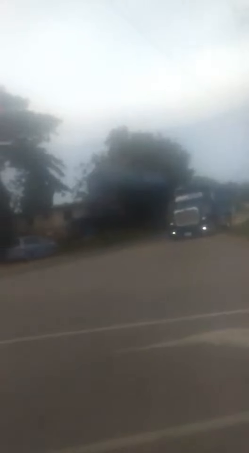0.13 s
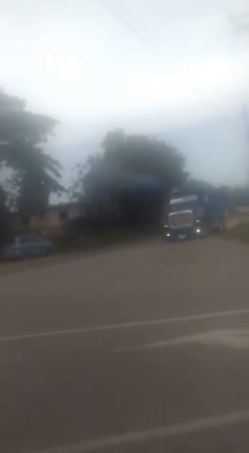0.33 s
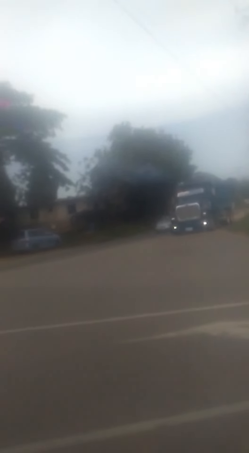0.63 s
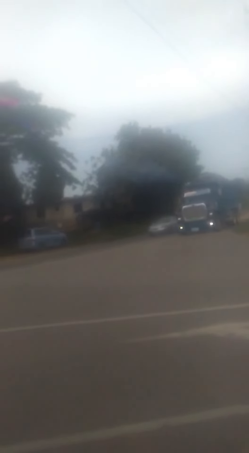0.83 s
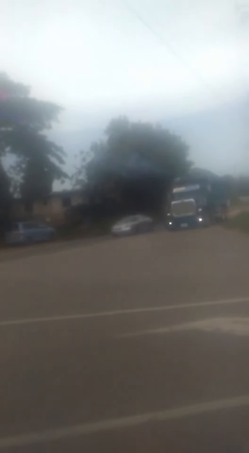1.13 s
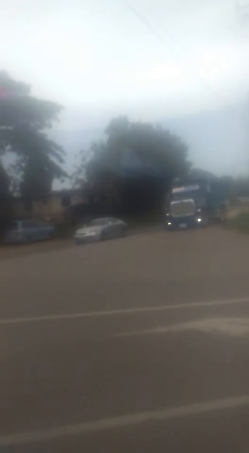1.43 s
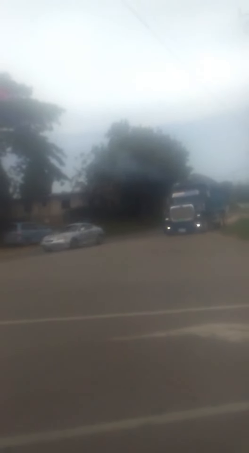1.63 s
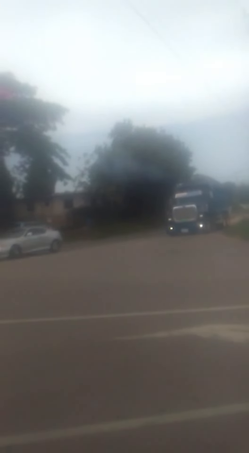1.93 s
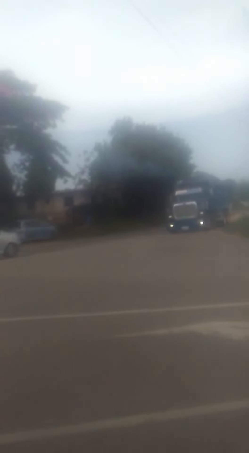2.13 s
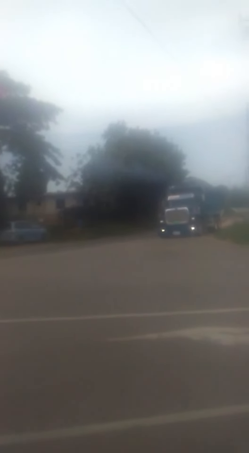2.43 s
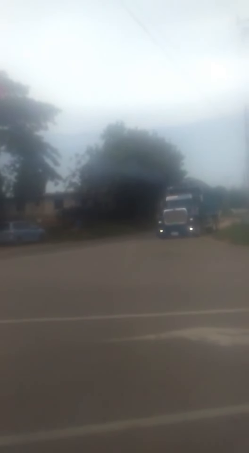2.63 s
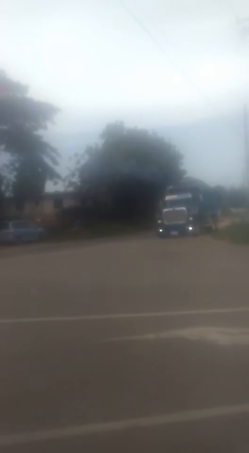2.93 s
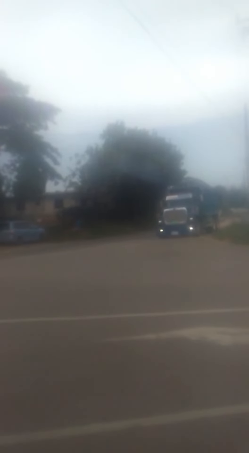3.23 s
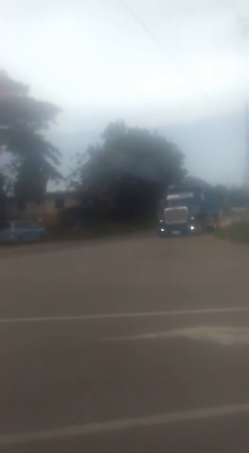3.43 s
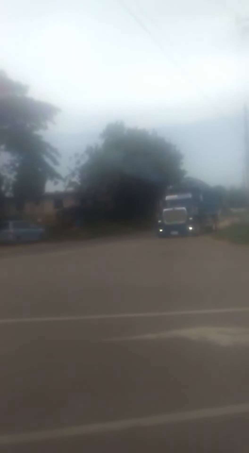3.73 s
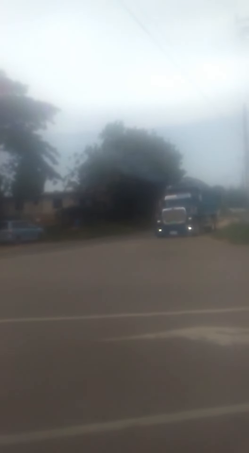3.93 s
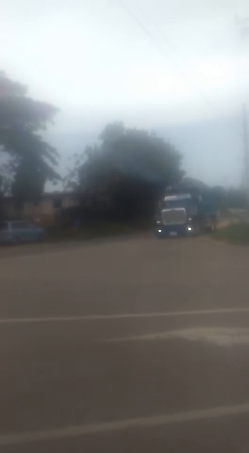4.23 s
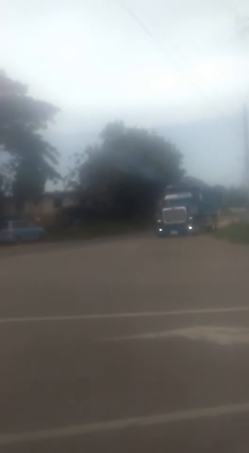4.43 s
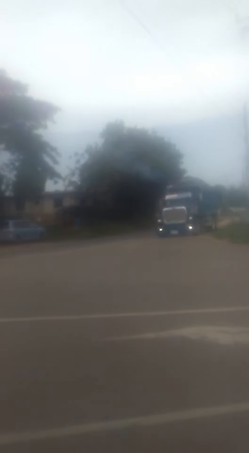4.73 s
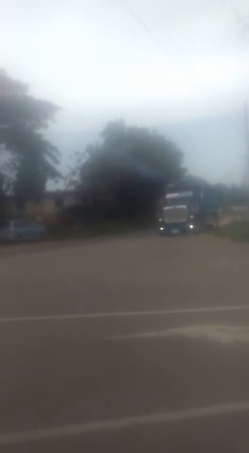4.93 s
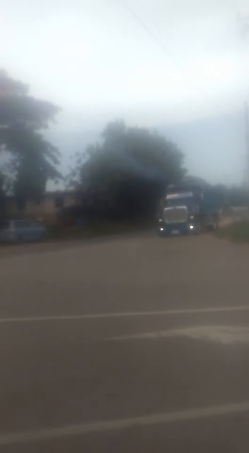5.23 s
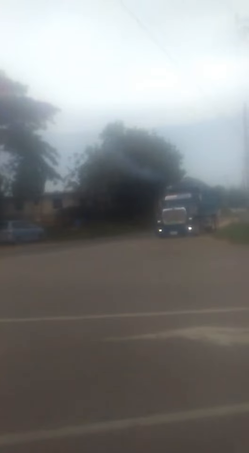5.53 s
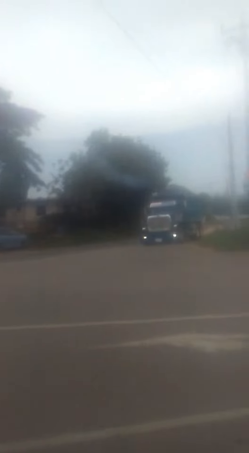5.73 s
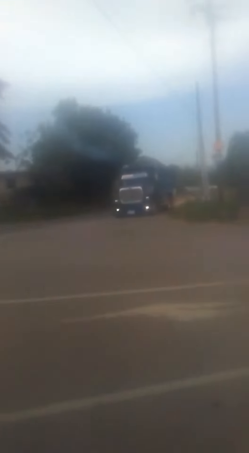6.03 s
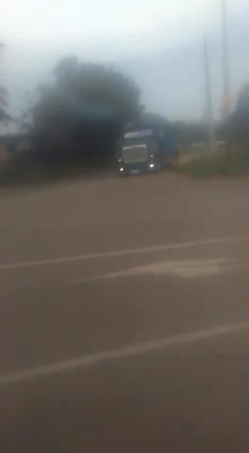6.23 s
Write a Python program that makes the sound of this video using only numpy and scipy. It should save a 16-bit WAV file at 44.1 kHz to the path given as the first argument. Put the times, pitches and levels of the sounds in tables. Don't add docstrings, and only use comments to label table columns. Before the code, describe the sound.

A heavy diesel truck drones steadily outdoors while a car rolls past with swelling tyre roar and brief brake squeals, then two faint air puffs.

```python
import sys
import numpy as np
from scipy import signal
from scipy.fft import rfft, irfft, next_fast_len
from scipy.io import wavfile
from scipy.ndimage import uniform_filter1d, map_coordinates

SR = 44100
rng = np.random.default_rng(int(sys.argv[2]) if len(sys.argv) > 2 else 0)


def gain_from_db(level_db):
    decades = np.asarray(level_db, float) / 20
    return 10 ** decades


def to_wav(sig):
    pcm = np.clip(np.atleast_2d(sig), -1, 1) * 32767
    pcm = np.round(pcm).astype(np.int16)
    wavfile.write(sys.argv[1], SR, pcm.T)


N = 280740

# (frequency [Hz], density [dB/Hz])
HISS_SPECTRUM = [(3120, -44), (5300, -18), (6390, -4.5), (7760, -1), (15100, -3), (15700, -4.5)]
# (frequency [Hz], density [dB/Hz])
GRIT_SPECTRUM = [(5000, -38), (6200, -11), (7800, -3), (9200, -2.5), (12000, -24)]
# (time [s], level [dB], pitch [Hz])
STONES = [
    (2.2494, -50, 11000),
    (2.3894, -55, 5870),
    (2.4274, -52, 7800),
    (2.6504, -47, 8000),
    (2.9184, -51, 8580),
    (3.05, -55, 7500),
    (3.1647, -60, 7140),
    (3.2294, -60, 7660),
    (3.3794, -58, 8200),
    (6.1394, -56, 7270),
]
# (cracks open [s], wide open [s], shuts [s], jet level [dB], edge level [dB])
PUFFS = [
    (5.64, 5.88, 5.955, -58, -68),
    (6.228, 6.275, 6.34, -55.5, -59.5),
]
# (frequency [Hz], density [dB/Hz])
JET_SPECTRUM = [(5000, -24), (5900, -6), (7400, 1), (8800, 0), (10400, -9.5), (13000, -30)]
# (frequency [Hz], density [dB/Hz])
LOW_JET_SPECTRUM = [(1400, -4), (1900, 1.5), (2800, -8.5), (3300, -4.5), (3700, -0.5), (4150, -7.5),
                    (4500, -17)]
# (frequency [Hz], density [dB/Hz])
EDGE_SPECTRUM = [(8500, -28), (10500, 6), (15700, -2)]
# (time [s], tyre level [dB], tyre horn resonance [Hz])
CAR_PASS = [
    (.75, -36.5, 900),
    (1.45, -30, 1017),
    (2, -28.5, 900),
    (2.25, -28.5, 880),
    (2.5, -28, 1074),
    (3, -29.5, 1194),
    (3.3, -27, 1275),
    (3.65, -32.5, 1290),
    (4.3, -41, 1170),
]
# (frequency [Hz], density [dB/Hz])
TYRE_SPECTRUM = [(380, -37), (520, -12), (680, -0.5), (1000, -4), (1250, -6.5), (1450, -14), (1800, -47)]
# (frequency [Hz], density [dB/Hz])
SIZZLE_SPECTRUM = [(1150, -25), (1400, -10), (1530, -0.5), (1650, -4.5), (1850, -4), (2150, -4),
                   (3000, -17.5), (3700, -19.5), (4300, -32)]
# (frequency [Hz], density [dB/Hz])
RUMBLE_SPECTRUM = [(110, -32.5), (190, -8.5), (255, 0), (330, -10.5), (480, -3), (620, -18), (900, -31)]
# (time [s], level rise [dB])
BUMPS = [
    (.85, 8.5),
    (1.45, 2),
    (2.07, 3),
    (2.62, 8.5),
    (2.78, 7),
    (3.29, 2),
    (4.15, 10),
]
# (time [s], level [dB])
SQUEALS = [
    (2.69, -31),
    (2.82, -26.5),
    (2.93, -34),
    (3.1, -33),
    (3.2, -33),
    (3.38, -32),
]
# (time [s], load [dB], exhaust note [dB])
LOAD = [(.8, 0, 1), (1.4, 2, 0.5), (1.85, 1.5, 4), (2.3, 2.5, -2), (2.8, -2, 6), (3.2, 1, -1.5),
        (3.7, -1, -0.5), (4.3, 0, -0.5), (5.1, -1.5, 1.5), (5.55, -1, 1.5), (5.9, -0.5, 4), (6.15, -1.5, 2),
        (6.28, 2, 0.5), (6.37, -4, 6)]
# (multiple of pulse rate [1], level [dB])
ORDERS = [(.5, -65), (1, -59), (2, -40.5), (3, -53.5), (4, -43), (6, -49.5), (8, -50), (10, -61)]
# (frequency [Hz], density [dB/Hz])
ROAR_SPECTRUM = [(22, -43), (33, -41), (50, -17.5), (100, -20.5), (135, -13.5), (200, -9), (270, -5),
                 (320, -7.5), (400, -5.5), (640, -7), (880, -7), (1150, -10.5), (1900, -17), (2400, -41)]
# (centre [Hz], width [Hz], level [dB])
BLOCK_MODES = [(2017, 27.4, 1.5), (2227, 194, 0), (2514, 410, -2), (2965, 504, -8), (3597, 630, -14)]
# (frequency [Hz], gain [dB])
MIC_RESPONSE = [(100, -0.5), (112, -6.5), (119, -16), (127, -9), (140, 1), (3950, 0.5), (4200, -7),
                (4400, -18), (4800, -36), (5200, -4.5), (5600, 0.5)]
# (frequency [Hz], density [dB/Hz])
SELF_NOISE_SPECTRUM = [(20, -7), (4300, -13), (5000, 4.5), (8000, -10), (15700, 1)]
# (frequency [Hz], density [dB/Hz])
SPLATTER_SPECTRUM = [(2530, -29), (4300, 4), (5110, -9), (5850, -15.5), (6430, -13), (7500, -22),
                     (9750, -47), (16500, -120)]
# (time [s], level [dB])
GLITCH = (5.3868, -37.5)

CORNER_FADE_S = 0.37


def unit(x):
    return x / np.sqrt(np.mean(x ** 2) + 1e-20)


def curves(rows):
    s, *cols = np.transpose(rows)
    return [np.interp(np.arange(N) / SR, s, c) for c in cols]


def during(start_s, end_s, edge_s=0.04):
    t = np.arange(N) / SR
    return np.clip(np.minimum(t - start_s, end_s + edge_s - t) / edge_s, 0, 1)


def wobble(rate_hz):
    fine = np.arange(0, N + 64, 64)
    knots = rng.standard_normal(int(N * rate_hz / SR) + 4)
    return np.interp(np.arange(N), fine, map_coordinates(knots, [fine * rate_hz / SR]))


def filtered(x, response):
    m = next_fast_len(N + 8192)
    return irfft(rfft(x, m) * response(np.fft.rfftfreq(m, 1 / SR)), m)[:N]


def rush(spectrum, patchy_db, shape=None):
    hz, t, z = signal.stft(rng.standard_normal(N), SR, nperseg=512)
    field = uniform_filter1d(rng.standard_normal(z.shape), size=4, axis=0)
    field = uniform_filter1d(field, size=12, axis=1)
    z = z * gain_from_db(patchy_db * unit(field))
    if shape:
        z = z * shape(hz[:, None], t)
    x = signal.istft(z, nperseg=512)[1][:N]
    f, db = np.transpose(spectrum)
    return unit(filtered(x, lambda hz: gain_from_db(np.interp(np.log(hz + 1), np.log(f), db, -120, -120))))


def road_hiss():
    near_db, far_db, hidden_s, dies_s, step_db = -63.5, -75, 2.74, 0.6, -4
    since_s = np.arange(N) / SR - hidden_s
    screened_db = step_db * np.clip(since_s / 0.1, 0, 1)
    screened_db = screened_db - 20 * np.maximum(since_s, 0) / dies_s / np.log(10)
    hiss_gain = np.hypot(gain_from_db(near_db + screened_db), gain_from_db(far_db + 1.5 * wobble(7)))
    hiss = hiss_gain * rush(HISS_SPECTRUM, patchy_db=0.8)

    grit_db, far_grit_db, grit_db_per_tyre_db = -71, -84, 2.2
    tyre_db = curves(CAR_PASS)[0]
    near = gain_from_db(grit_db + grit_db_per_tyre_db * (tyre_db - tyre_db.max()))
    near = near * during(-1, CAR_PASS[-1][0], edge_s=CORNER_FADE_S)
    uneven = gain_from_db(1.8 * wobble(9) + 1.5 * wobble(25))
    grit = np.hypot(near, gain_from_db(far_grit_db)) * uneven * rush(GRIT_SPECTRUM, patchy_db=1)

    t = np.arange(SR // 25) / SR
    stones = np.zeros(N + SR)
    for s, db, hz in STONES:
        scrape = signal.lfilter(*signal.iirpeak(hz, 8, SR), rng.standard_normal(len(t)))
        envelope = np.exp(-((t - 0.012) / 0.008) ** 2)
        stones[round(s * SR):][:len(t)] += gain_from_db(db - 11.5) * envelope * unit(scrape)
    return hiss + grit + stones[:N]


def brake_air():
    cracked_db, low_cracked_db = -22, -5
    low_over_jet_db, edge_db_per_jet_db = 23.5, 0.55
    jet_fall_db_per_s, low_fall_db_per_s = 53, 76
    t = np.arange(N) / SR
    jet, edge, low = 0, 0, 0
    for open_s, wide_s, shut_s, jet_db, edge_db in PUFFS:
        closed = np.clip((wide_s - t) / (wide_s - open_s), 0, 1)
        after_s = np.maximum(t - shut_s, 0)
        gate = during(open_s, 9, edge_s=0.047)
        flow_db = cracked_db * closed - jet_fall_db_per_s * after_s
        low_flow_db = low_cracked_db * closed - low_fall_db_per_s * after_s
        jet = jet + gate * gain_from_db(jet_db + flow_db)
        edge = edge + gate * gain_from_db(edge_db + edge_db_per_jet_db * flow_db)
        low = low + gate * gain_from_db(jet_db + low_over_jet_db + low_flow_db)
    jet = jet * rush(JET_SPECTRUM, patchy_db=0.5)
    edge = edge * rush(EDGE_SPECTRUM, patchy_db=0.4)
    return jet + edge + low * rush(LOW_JET_SPECTRUM, patchy_db=3.5)


def pad_squeal():
    squeal_hz, dip_hz, dip_s = 2210, 65, 0.05
    bite_db_per_s, release_db_per_s = 69, 132
    t = np.arange(N) / SR
    bites_db = [db + np.minimum(bite_db_per_s * (t - at), release_db_per_s * (at - t)) for at, db in SQUEALS]
    strongest_db = SQUEALS[1][1]
    sag = sum(np.exp(-((t - at) / dip_s) ** 2) * gain_from_db(db - strongest_db) for at, db in SQUEALS)
    phase = 2 * np.pi * np.cumsum(squeal_hz - dip_hz * sag) / SR + 0.9 * wobble(70)
    chatter = gain_from_db(3 * wobble(60) - 2.5)
    return gain_from_db(np.max(bites_db, axis=0)) * chatter * np.sin(phase)


def car():
    t = np.arange(N) / SR
    tyre_db = curves(CAR_PASS)[0]
    s, _, peak_hz = np.transpose(CAR_PASS)

    def horn(hz, t):
        return 1 + 1.9 / (1 + ((hz - np.interp(t, s, peak_hz)) / 75) ** 2)

    def ground(hz, t):
        multiple, width_hz, depth = 1.51, 65, 0.42
        return 1 - depth / (1 + ((hz - multiple * np.interp(t, s, peak_hz)) / width_hz) ** 2)

    tyre_gain = gain_from_db(tyre_db + 1.06 * wobble(14) + 0.46 * wobble(29.67))
    tyres = tyre_gain * rush(TYRE_SPECTRUM, patchy_db=0.8, shape=horn)

    sizzle_db, turn_s, turn_db, turn_takes_s = -5.5, 2.3, 3, 0.4
    facing_db = turn_db / 2 * np.tanh((t - turn_s) / turn_takes_s)
    sizzle = gain_from_db(tyre_db + sizzle_db + facing_db) * rush(SIZZLE_SPECTRUM, patchy_db=1.5, shape=ground)

    rumble_db, bump_s = -8.5, 0.099
    shudder_db = sum(db * np.exp(-((t - at) / bump_s) ** 2) for at, db in BUMPS)
    body_gain = gain_from_db(tyre_db + rumble_db + shudder_db + 1.1 * wobble(12))
    body = body_gain * rush(RUMBLE_SPECTRUM, patchy_db=0.3)
    return during(-1, s[-1], edge_s=CORNER_FADE_S) * (tyres + sizzle + body) + pad_squeal()


def truck():
    pulse_hz = 143.74
    roar_db, clatter_db, clatter_db_per_load_db = -32.5, -37.5, 0.49
    load_db, note_db = curves(LOAD)
    turn = 2 * np.pi * np.cumsum(pulse_hz * (1 + 0.005 * wobble(5))) / SR

    tones = 0
    for k, db in ORDERS:
        flutter = gain_from_db(3 * wobble(18) + 1.5 * wobble(4) - 1)
        phase = k * (turn + 0.27 * wobble(12)) + 0.7 * wobble(24)
        tones = tones + gain_from_db(db) * flutter * np.sin(phase)
    tones = np.sqrt(2) * gain_from_db(note_db) * tones

    roar = gain_from_db(roar_db + load_db + 1.27 * wobble(6.5)) * rush(ROAR_SPECTRUM, patchy_db=1.06)

    def block(f):
        total = 0
        for k, (c, w, db) in enumerate(BLOCK_MODES):
            total = total + (-1) ** k * gain_from_db(db) * 1j * f * w / (c * c - f * f + 1j * f * w)
        return total

    knock = gain_from_db(1.2 * np.cos(turn / 6) + 0.6 * np.cos(turn / 2) + 1.5 * wobble(60))
    blows = knock * rush([(1200, 0.0041), (4600, 0.0017)], patchy_db=0.5)
    clatter_gain = gain_from_db(clatter_db + clatter_db_per_load_db * load_db + 0.8 * wobble(5.132))
    return tones + roar + clatter_gain * unit(filtered(blows, block))


def scene():
    return (road_hiss() + brake_air() + car() + truck())[None]


def roll_off(x):
    return signal.sosfilt(signal.butter(12, 16070, fs=SR, output="sos"), x)


def record(dry):
    open_s, fade_s, fade_power, gain_db = 0.486, 0.34, 0.69, -2.5
    hz, db = np.transpose(MIC_RESPONSE)
    t = np.arange(N) / SR
    x = filtered(dry[0], lambda f: gain_from_db(np.interp(f, hz, db)))
    x = x + gain_from_db(-76.5) * rush(SELF_NOISE_SPECTRUM, patchy_db=2.0)
    x = x * gain_from_db(gain_db) * np.clip((t - open_s) / fade_s, 0, 1) ** fade_power

    splatter_db, settled_s, fall_db_per_s = -64.5, 0.75, 70
    splatter_gain = gain_from_db(splatter_db - fall_db_per_s * np.maximum(t - settled_s, 0))
    x = x + splatter_gain * during(open_s, 9, edge_s=0.02) * rush(SPLATTER_SPECTRUM, patchy_db=2.0)

    glitch_s, glitch_db = GLITCH
    thump = np.exp(-np.arange(12) / 1.4)
    x[round(glitch_s * SR):][:len(thump)] += gain_from_db(glitch_db) * thump
    return roll_off(x[None])


dry = scene()
out = record(dry)
to_wav(out)
```